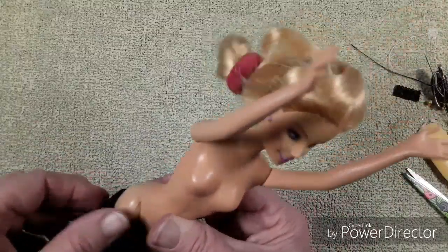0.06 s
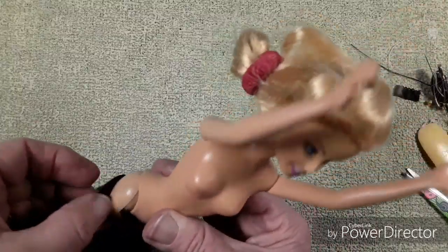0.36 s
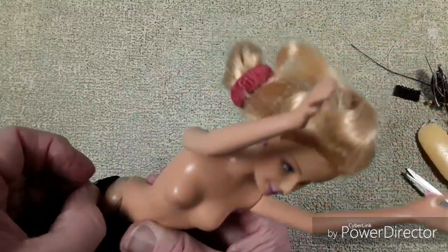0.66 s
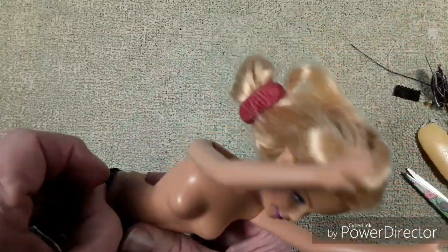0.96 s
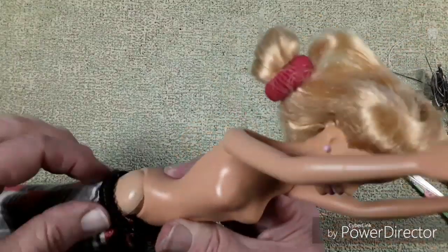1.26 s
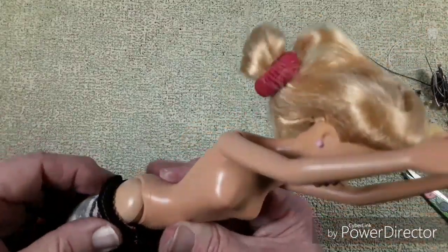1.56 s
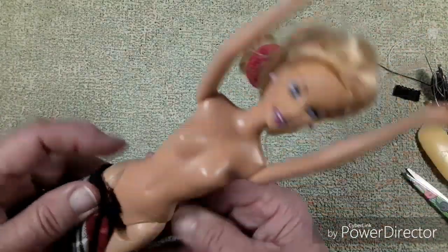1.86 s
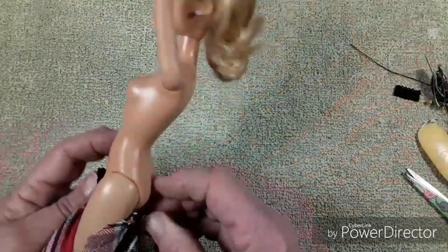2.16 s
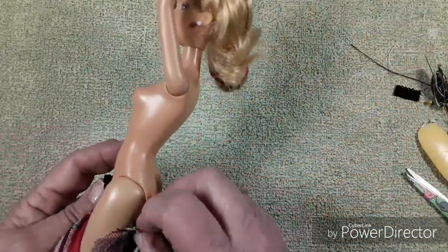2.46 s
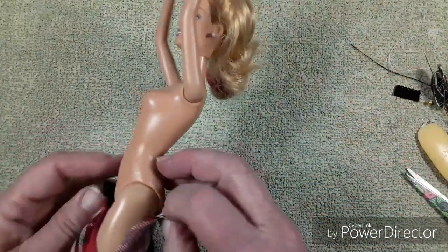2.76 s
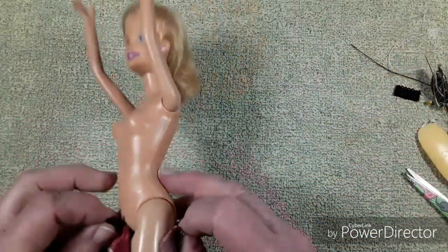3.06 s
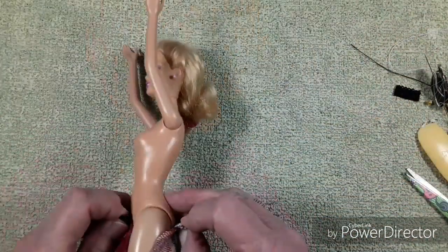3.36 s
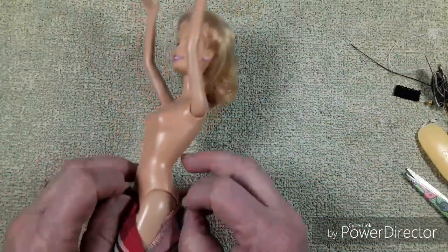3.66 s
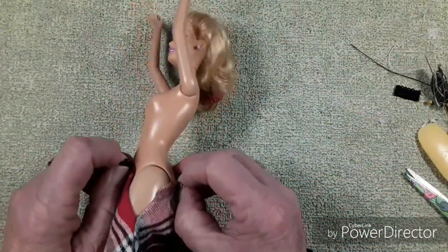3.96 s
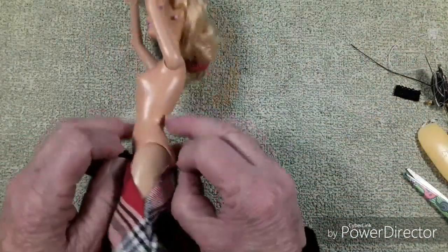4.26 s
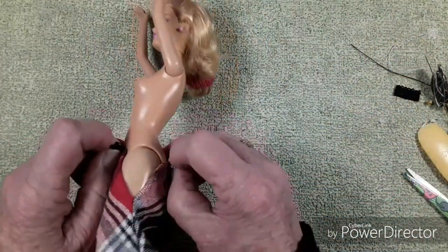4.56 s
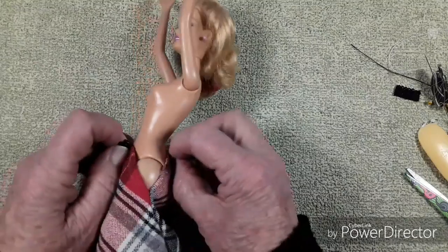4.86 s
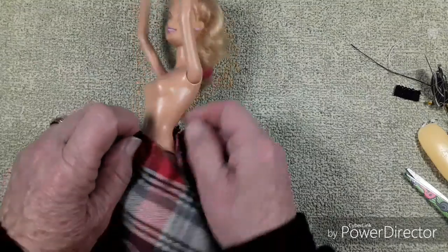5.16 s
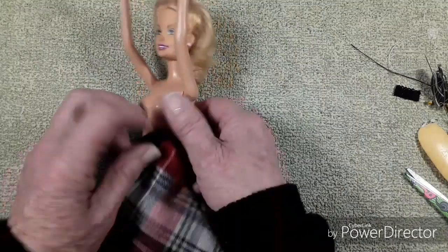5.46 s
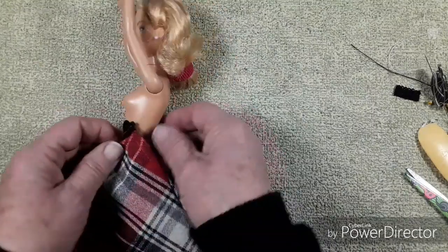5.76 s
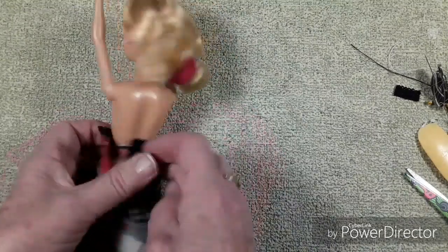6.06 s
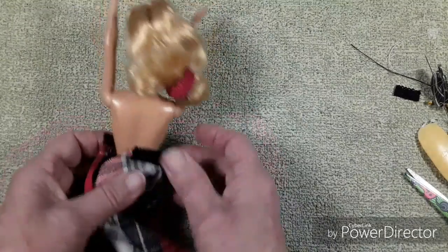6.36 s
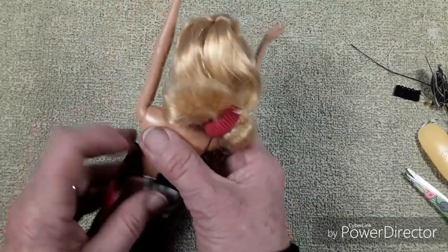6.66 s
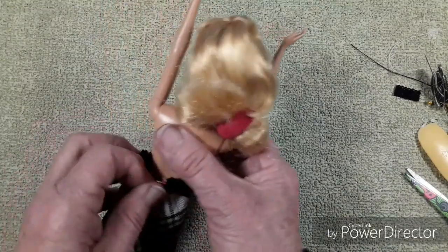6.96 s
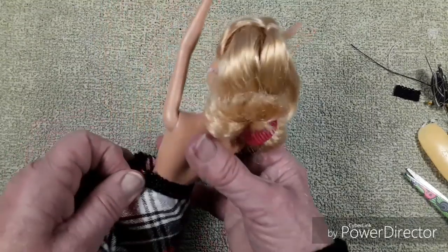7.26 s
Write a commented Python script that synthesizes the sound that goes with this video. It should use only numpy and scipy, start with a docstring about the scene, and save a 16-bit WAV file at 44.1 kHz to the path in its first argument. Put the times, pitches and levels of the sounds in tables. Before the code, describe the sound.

Hands work a fabric skirt up a plastic doll: soft rustles, little joint clicks and a tiny hook ticking and scraping in a quiet room.

```python
"""Cloth rustles faintly over a low hum as hands pull a skirt up a plastic doll, above a covered table.
Friction makes the weave hiss and catch, the waistband judders by stick-slip, and the doll's joints click.
The skirt's small metal hook ticks and scrapes, ringing in its modes, while the handling shakes the table.
The room is quiet; a small close microphone with a sharp treble resonance gives everything a thin sizzle."""
import sys
import numpy as np
from scipy import signal
from scipy.fft import rfft, irfft, next_fast_len
from scipy.io import wavfile

SR = 44100
rng = np.random.default_rng(int(sys.argv[2]) if len(sys.argv) > 2 else 0)


def unload_audio(sound):
    """Save the sound as a 16-bit wav file, at the path given as the first command line argument."""
    columns = np.transpose(np.atleast_2d(sound))
    # keep every value between -1 and 1, then stretch to whole-number steps
    steps = np.round(np.clip(columns, -1, 1) * 32767)
    wavfile.write(sys.argv[1], SR, steps.astype(np.int16))


N = 327133
TIME = np.arange(N) / SR
CLICK_DELAY_S = 0.00047   # the doll's clicks and the hook's ticks sound this long after their listed times


def from_db(db):
    """Amplitude ratio of a level in decibels."""
    return 10 ** (np.asarray(db) / 20)


def unit_rms(x):
    """Normalisation to unit mean power."""
    return x / np.sqrt(np.mean(x ** 2) + 1e-20)


def envelope(rows):
    """Amplitude envelope, interpolated in decibels between (time, level) points."""
    times, db = np.transpose(rows)
    return from_db(np.interp(TIME, times, db))


def coloured(x, spectrum):
    """Spectral shaping to unit rms, falling 12 dB per octave below the first point."""
    size = next_fast_len(N)
    hz, db = np.transpose(spectrum)
    log_f = np.log(np.arange(size // 2 + 1) * SR / size + 1e-9)
    gain = from_db(np.interp(log_f, np.log(hz), db))
    gain *= np.minimum(np.exp(log_f) / hz[0], 1) ** 2
    return unit_rms(irfft(rfft(x, size) * gain, size)[:N])


def drift(per_s):
    """Random modulation of unit rms, linear between Gaussian values."""
    knots = rng.standard_normal(N // 20)
    return unit_rms(np.interp(TIME * per_s, np.arange(len(knots)), knots))


def swell(offset_s, length_s):
    """Gaussian envelope of a stroke about its middle."""
    return np.exp(-2 * (2 * offset_s / length_s) ** 2)


def swells(rows):
    """Superposition of stroke envelopes."""
    out = np.zeros(N)
    for middle, length, db in rows:
        near = slice(*np.searchsorted(TIME, [middle - 2 * length, middle + 2 * length]))
        out[near] += from_db(db) * swell(TIME[near] - middle, length)
    return out


def strokes(rows, spectrum, ripple_db, threads_per_s):
    """Friction noise, amplitude-modulated as each stroke crosses the threads."""
    friction = rng.standard_normal(N) * from_db(ripple_db * drift(threads_per_s))
    return swells(rows) * coloured(friction, spectrum)


def impulses(times, sizes):
    """Brief forces idealised as an impulse train."""
    out = np.zeros(N)
    samples = np.round(np.asarray(times) * SR).astype(int)
    np.add.at(out, np.clip(samples, 0, N - 1), sizes)
    return out


def ring(force, modes):
    """Modal superposition: each impulse excites one damped sinusoid per mode."""
    out = np.zeros(N)
    for k, (hz, db, t60) in enumerate(modes):
        radius = np.exp(-np.log(1000) / (t60 * SR))
        angle = 2 * np.pi * hz / SR
        poles = [1, -2 * radius * np.cos(angle), radius ** 2]
        out += (-1) ** k * from_db(db) * signal.lfilter([0, np.sin(angle)], poles, force + 1e-18)
    return out


def chatter(times, db, share, settle_s):
    """Contact bounce: random after-touches follow each impact and decay exponentially."""
    age = TIME[:SR // 20]
    touches = rng.standard_normal((len(times), len(age))) * np.exp(-age / settle_s)
    touches *= share / np.linalg.norm(touches, axis=1, keepdims=True)
    touches[:, 0] = 1   # the impact itself
    return impulses(times[:, None] + age, from_db(db)[:, None] * touches)


def slip_train(middle, length, per_s, uneven, db):
    """Stick-slip friction: nearly periodic impulses that swell and fade."""
    lateness, scatter_db = rng.standard_normal((2, 801))
    count = len(lateness)
    offset = (np.arange(count) - count // 2 + uneven * lateness) / per_s
    sizes = swell(offset, length) * from_db(db + uneven * scatter_db)
    return impulses(middle + offset, sizes * rng.choice([-1, 1], count))


def small_radiator(x, edge_hz=2360, order=2):
    """Radiation efficiency: a source much smaller than the wavelength loses its lows."""
    return signal.sosfilt(signal.butter(order, edge_hz, "high", fs=SR, output="sos"), x + 1e-18)


# noise floor: (frequency [Hz], relative spectral level [dB])
BACKGROUND_SPECTRUM = [(30, -5), (70, -8), (160, -0.5), (300, -2.5), (600, -20), (1300, -23.5), (2300, -18),
                       (4000, -37.5), (6500, -45.5), (8500, -57.5), (12000, -27.5), (15500, -13.5)]
def background(level_db=-65.5):
    """Stationary noise: a low rumble with a faint hiss."""
    return from_db(level_db) * coloured(rng.standard_normal(N), BACKGROUND_SPECTRUM)


def room(x, level_db=-10.5, t60_s=0.16, first_echo_s=0.0031):
    """Diffuse reverberation: dense reflections decay exponentially in a small furnished room."""
    age = TIME[:SR // 2]
    decay = np.exp(-np.log(1000) * age / t60_s) * (age > first_echo_s)
    tail = rng.standard_normal(len(age)) * decay
    return from_db(level_db) * signal.oaconvolve(x, tail / np.linalg.norm(tail))[:N]


# shaking, stronger once the doll stands and the hands lean on the table: (time [s], level [dB])
LEANING = [(0.0, -67), (.27, -76.5), (.48, -64), (1.0, -68), (1.7, -65.5), (3.03, -69), (3.15, -59),
           (7.42, -57)]
# shoves that rock the table: (centre time [s], duration [s], level [dB])
SHOVES = [(3.45, 0.099, -61), (3.63, 0.11, -56), (3.87, 0.3, -53.5), (4.26, 0.19, -56.5), (5.25, 0.31, -59),
          (5.72, .18, -54), (5.94, 0.21, -56), (6.28, 0.3, -49), (6.6, 0.21, -47.5), (6.74, 0.12, -48.5),
          (7.35, 0.24, -52.5)]
def table_shake(mode_hz=39.5, wander_hz=2.2, unsteady_db=2.8):
    """Forced vibration: the hands keep the table moving unsteadily in its lowest mode."""
    phase = 2 * np.pi * np.cumsum(mode_hz + wander_hz * drift(16)) / SR
    vibration = unit_rms(np.sin(phase) * from_db(unsteady_db * drift(15)))
    return (envelope(LEANING) + swells(SHOVES)) * vibration


# hand and doll meet the table: (time [s], force level [dB])
BUMPS = [(0.074, -65), (1.505, -68), (1.53, -74), (3.241, -62), (3.266, -61), (3.29, -66), (5.412, -50.5),
         (5.422, -41.5), (6.019, -59), (6.531, -64)]
# table resonances: (frequency [Hz], gain [dB], T60 [s])
TABLE_MODES = [(109.6, -7, 0.15), (156, -5, 0.23), (258.4, 1.5, 0.3), (335, -6, 0.17), (416, -5, 0.1),
               (663, -7.5, 0.052), (1057, -9.5, 0.011)]
def table_bumps(soft_hz=1500):
    """Compliant impact: a soft contact low-passes the force that excites the table's modes."""
    times, db = np.transpose(BUMPS)
    softness = signal.butter(1, soft_hz, fs=SR, output="sos")
    force = signal.sosfilt(softness, impulses(times, from_db(db)) + 1e-18)
    return ring(force, TABLE_MODES)


# how hard the fingers work: (time [s], relative level [dB])
EFFORT = [(0.0, -66), (3.18, -64), (3.39, -55), (4.21, -63.5), (4.55, -56), (4.85, -61.5), (5.64, -56),
          (6.8, -59), (7.13, -63.5), (7.42, -64.5)]
# fingers on the doll: (frequency [Hz], relative spectral level [dB])
RUBBING_SPECTRUM = [(50, -2.5), (85, 1.5), (132, -1), (158, 8.5), (185, -6), (218, 1), (310, -6.5),
                    (450, -12), (700, -15), (1200, -21), (3200, -39)]
def finger_rubbing(gain_db=-2.5, uneven_db=1.98):
    """Sliding friction: dull noise whose amplitude follows the effort of the fingers."""
    effort = envelope(EFFORT) * from_db(gain_db + uneven_db * drift(17))
    return effort * coloured(rng.standard_normal(N), RUBBING_SPECTRUM)


# shifts of grip: (centre time [s], duration [s], level [dB])
REGRIPS = [(1.54, 0.054, -62), (3.28, 0.22, -54), (6.02, 0.062, -64.5), (6.57, 0.21, -55.5)]
# dull scuff: (frequency [Hz], relative spectral level [dB])
SCUFF_SPECTRUM = [(100, -19), (155, 7), (185, 0.5), (220, 9.5), (310, 4), (400, -16), (700, -24),
                  (1500, -32), (3000, -45)]
def grip_scuffs():
    """Transient friction: each shift of grip gives a burst of low noise."""
    return strokes(REGRIPS, SCUFF_SPECTRUM, ripple_db=2.5, threads_per_s=56)


# quick finger strokes: (centre time [s], duration [s], level [dB])
BRUSHES = [(1.52, 0.5, -71), (1.722, 0.031, -61), (1.752, 0.055, -57), (1.872, 0.043, -54.5),
           (1.925, 0.04, -62), (6.32, 0.09, -74)]
# fingers on the weave: (frequency [Hz], relative spectral level [dB])
BRUSH_SPECTRUM = [(500, -39), (2500, -24), (4500, -11), (6500, -13.5), (8500, -7.5), (11000, -2),
                  (15500, 3)]
def finger_brushes():
    """Roughness noise: fingers cross the threads quickly and make a bright hiss."""
    return strokes(BRUSHES, BRUSH_SPECTRUM, ripple_db=1.5, threads_per_s=1000)


# pulls of the skirt: (centre time [s], duration [s], level [dB])
SLIDES = [(0.28, 0.05, -73), (0.945, 0.09, -67.5), (1.03, 0.1, -77), (1.215, 0.086, -71.5),
          (1.275, 0.05, -77), (2.07, 0.26, -71), (2.24, 0.31, -69.5)]
# cloth on plastic: (frequency [Hz], relative spectral level [dB])
SLIDE_SPECTRUM = [(600, 12.5), (1500, 0.5), (1950, 10.5), (2270, 16), (2750, 3.5), (3600, -1), (4200, -0.5),
                  (4650, 7), (5100, -4.5), (5600, -1.5), (7000, -4), (10000, -4.5), (15000, -6)]
def skirt_slides():
    """Resonant colouring: the hollow hips shape the friction noise of the sliding skirt."""
    return strokes(SLIDES, SLIDE_SPECTRUM, ripple_db=2.5, threads_per_s=300)


# taut threads zip over plastic: (centre time [s], duration [s], level [dB])
WHISTLES = [(2.813, 0.026, -69), (2.945, 0.085, -79.5), (3.1, 0.093, -83.5), (3.88, 0.094, -72),
            (3.976, 0.014, -70.5), (4.183, 0.016, -78), (4.22, 0.02, -83), (5.045, 0.038, -80.5),
            (5.078, 0.054, -76), (5.575, 0.036, -82.5), (5.735, 0.015, -96), (5.94, 0.031, -84),
            (6.28, 0.033, -82.5), (6.635, 0.049, -79.5)]
def thread_whistles(pitch_hz=8470, wander_hz=206, jitter_hz=418, flutter_db=2.5):
    """Friction-induced oscillation: a thin, unsteady tone flutters as threads grip and let go."""
    hz = pitch_hz + wander_hz * drift(45) + jitter_hz * drift(1600)
    tone = np.sin(2 * np.pi * np.cumsum(hz) / SR)
    return swells(WHISTLES) * unit_rms(tone * from_db(flutter_db * drift(170)))


# one squeak of cloth on plastic: (time [s], frequency [Hz], half duration [s], level [dB])
SQUEAK = (3.6176, 8450, .0007, -40.5)
def cloth_squeak(fall_hz_per_s=300000):
    """Rapid stick-slip: the slips fuse into a very short falling chirp."""
    middle, hz, half_length, db = SQUEAK
    offset = TIME - middle
    phase = 2 * np.pi * (hz - .5 * fall_hz_per_s * offset) * offset
    return from_db(db) * np.exp(-(offset / half_length) ** 2) * np.sin(phase)


# the skirt never lies quite still in the fingers: (time [s], relative level [dB])
CREEP = [(0.0, -72), (1.12, -75), (1.45, -70), (1.82, -75), (2.09, -64), (2.55, -75), (3.26, -67),
         (4.15, -68), (4.42, -61), (4.66, -69), (4.9, -66), (5.0, -71), (5.29, -65), (5.66, -70),
         (6.62, -68), (6.84, -81), (7.08, -81), (7.42, -71)]
# tugs at the waistband: (centre time [s], duration [s], relative level [dB])
TUGS = [(0.275, 0.061, -67.5), (0.94, 0.05, -65), (1.21, 0.086, -61), (1.28, 0.04, -66), (1.45, 0.041, -69),
        (1.59, 0.075, -65), (2.14, 0.28, -98), (2.925, 0.093, -60), (3.345, 0.13, -54),
        (3.56, 0.031, -53.5), (3.885, 0.19, -58.5), (3.976, 0.013, -59), (4.63, 0.039, -57),
        (5.395, 0.056, -57), (6.31, 0.14, -65), (6.745, 0.13, -57.5), (7.18, 0.12, -66.5),
        (7.38, 0.16, -66)]
# rustling weave: (frequency [Hz], relative spectral level [dB])
CLOTH_SPECTRUM = [(400, -1.5), (900, 7), (1500, -36.5), (2300, 3.5), (3200, 3), (4700, 0.5), (6500, -4),
                  (8500, 3), (11000, 5.5), (15500, -2)]
def cloth_rustle(gain_db=-15, creep_db=0.5, fidget_db=2.6, clump_db=3.0, catches_per_s=500):
    """Shot noise: threads catch and let go over the hiss of sliding weave, swelling in clumps."""
    speed = envelope(CREEP) * from_db(creep_db - fidget_db * drift(17)) + swells(TUGS)
    caught = rng.random(N) < catches_per_s / SR
    catch_db = 2.0 * np.minimum(rng.exponential(1, N), 4)
    catches = unit_rms(caught * from_db(catch_db) * rng.choice([-1, 1], N))
    hiss = 0.81 * rng.standard_normal(N)
    return from_db(gain_db + clump_db * drift(60)) * speed * coloured(catches + hiss, CLOTH_SPECTRUM)


# the tight waistband judders over the hips:
# (centre time [s], duration [s], slip rate [1/s], unevenness [0-1], level [dB], ring coupling [dB])
CREAKS = [(2.436, 0.03, 255, 0.03, -34.5, -19.5), (2.674, .018, 400, 0.15, -52.5, -17.5),
          (2.797, .022, 700, 0.38, -56, -13), (2.813, 0.014, 420, .25, -41, -20.5),
          (2.949, 0.018, 290, 0.1, -45.5, -17)]
# plastic and hook under the waistband: (frequency [Hz], gain [dB], T60 [s])
CREAK_MODES = [(1560, -1.5, 0.0067), (2600, -1.5, 0.0099), (3590, 3.5, 0.013), (4600, -14, 0.0099),
               (6250, -8, 0.015), (6970, -8, 0.0054)]
def waistband_creaks():
    """Relaxation oscillation: each slip of the waistband snaps and rings what lies under it."""
    slips, on_plastic = np.zeros((2, N))
    for middle, length, per_s, uneven, db, ring_db in CREAKS:
        train = slip_train(middle, length, per_s, uneven, db)
        slips += train
        on_plastic += train * from_db(ring_db)
    return small_radiator(slips) + ring(on_plastic, CREAK_MODES)


# one pop of the hip joint: (time [s], snap level [dB], leg level [dB])
HIP_POP = (1.2448, -32, -52)
# hollow leg: (frequency [Hz], gain [dB], T60 [s])
LEG_MODES = [(1006, 0, 0.0055), (2130, 9, 0.0048), (2840, 9, 0.0033), (4120, 1.5, 0.0067),
             (5700, 2, 0.0049), (6300, -12, .004)]
def hip_pop():
    """Impulsive release: the joint lets go with a snap that rings the hollow leg."""
    times, snap_db, leg_db = np.transpose([HIP_POP])
    snap = small_radiator(chatter(times, snap_db, share=0.9, settle_s=0.0014))
    leg = ring(chatter(times, leg_db, share=1.0, settle_s=0.0011), LEG_MODES)
    return snap + leg


# joints and limbs click, and the fastening knocks on the doll:
# (time [s], snap level [dB], shell level [dB], relative torso level [dB])
DOLL_CLICKS = [(1.8894, -44, -70, -58), (2.217, -72, -62, -60), (2.734, -51.5, -72, -78),
               (3.273, -36, -56, -62), (3.327, -36, -40, -53), (3.333, -42, -53, -49),
               (3.441, -50, -63, -71), (3.4824, -63, -56, -70), (3.8263, -40, -52, -48.5),
               (3.8352, -45, -59, -50.5), (3.8456, -46, -57, -51), (4.104, -53.5, -58, -62),
               (4.4349, -39, -48, -50), (4.4499, -46, -39.5, -59), (4.589, -62, -53.5, -66),
               (4.849, -77, -60, -61), (5.409, -52, -51, -46), (5.423, -66, -56, -48),
               (5.745, -55, -51, -60), (6.7696, -45.5, -34.5, -53), (6.8218, -80, -42.5, -48.5)]
# hollow shell and torso: (frequency [Hz], gain [dB], T60 [s])
SHELL_MODES = [(1570, 1, 0.0044), (2130, 10, 0.0032), (2366, 2.5, 0.0073), (2800, -18, 0.0054),
               (4540, -17, 0.00061), (5040, -22, 0.01), (6690, -17.5, 0.008)]
TORSO_MODES = [(497, 2, 0.012), (746, 2.5, 0.0086), (1030, 1, 0.012), (1290, -5.5, 0.012)]
def doll_clicks(knock_db=-2):
    """Impact excitation: each contact gives a dry snap, rings the shell and knocks the torso."""
    times, snap_db, shell_db, torso_db = np.transpose(DOLL_CLICKS)
    times = times + CLICK_DELAY_S
    snap = small_radiator(chatter(times, snap_db, share=1.82, settle_s=0.0017))
    shell = ring(chatter(times, shell_db, share=0.76, settle_s=0.0023), SHELL_MODES)
    knock = ring(chatter(times, torso_db, share=0.57, settle_s=0.0028), TORSO_MODES)
    return snap + shell + from_db(knock_db) * knock


# the hook strikes its eye: (time [s], snap level [dB], ring level [dB])
HOOK_TICKS = [(3.7977, -34, -49), (3.8269, -25.5, -42.5), (3.8447, -33, -45.5), (3.972, -50, -76),
              (4.178, -58, -79), (4.2548, -39.5, -46.5), (4.3459, -26.5, -39.5), (4.3822, -32, -45),
              (4.4349, -15.5, -28), (4.4755, -9.5, -22), (5.1876, -44, -58), (5.2497, -37.5, -56),
              (5.452, -50, -55.5), (5.891, -57, -59)]
# metal hook: (frequency [Hz], gain [dB], T60 [s])
HOOK_MODES = [(3340, -8, 0.0067), (3525, 1.5, 0.015), (3690, -4, 0.011), (4650, -17, 0.007),
              (5380, -7.5, 0.005), (6360, -11, 0.006), (6850, -15.5, .005), (8000, -17, .005)]
def hook_ticks(grip_detune=0.008, uneven_db=2.5):
    """Free vibration after a thin snap: each new grip shifts the pitch and strength of the modes."""
    times, snap_db, ring_db = np.transpose(HOOK_TICKS)
    times = times + CLICK_DELAY_S
    contacts = chatter(times, snap_db, share=1.0, settle_s=0.0017)
    out = small_radiator(contacts, edge_hz=3300, order=4)
    age = TIME[:SR // 20]
    hz, mode_db, t60 = np.transpose(HOOK_MODES)[:, :, None]
    signs = (-1) ** np.arange(len(HOOK_MODES))[:, None]
    for time, db in zip(times, ring_db):
        shift, strength = rng.standard_normal((2, len(HOOK_MODES), 1))
        decays = from_db(db + mode_db + uneven_db * strength) * np.exp(-np.log(1000) * age / t60)
        tones = np.sin(2 * np.pi * hz * (1 + grip_detune * shift) * age)
        start = round(time * SR)
        out[start:start + len(age)] += np.sum(signs * decays * tones, axis=0)
    return small_radiator(out, edge_hz=1700)


# the hook scrapes on cloth and plastic: (centre time [s], duration [s], level [dB], hook coupling [dB])
HOOK_DRAGS = [(3.619, 0.0049, -45, -9), (3.8495, 0.0086, -36, -21), (4.278, 0.043, -59.5, -8),
              (4.302, 0.02, -52, -11), (4.392, 0.043, -36, -12.5), (4.4328, 0.0057, -25.5, -14),
              (4.4403, 0.0058, -33.5, -18), (5.307, 0.3, -60.5, -22), (5.401, 0.086, -51, -19.5),
              (6.039, 0.04, -61.5, -8)]
def hook_drags(pressed_t60_share=0.82, shell_db=-26, torso_db=-29):
    """Stick-slip excitation: fast, uneven slips ring the doll and the hook, damped by being pressed."""
    slips, on_hook = np.zeros((2, N))
    for middle, length, db, hook_db in HOOK_DRAGS:
        train = slip_train(middle, length, per_s=2000, uneven=0.53, db=db)
        slips += train
        on_hook += train * from_db(hook_db)
    pressed_modes = [(hz, db, t60 * pressed_t60_share) for hz, db, t60 in HOOK_MODES]
    shell = from_db(shell_db) * ring(slips, SHELL_MODES)
    torso = from_db(torso_db) * ring(slips, TORSO_MODES)
    return small_radiator(slips) + ring(on_hook, pressed_modes) + shell + torso


def scene():
    """Linear superposition of the bright sounds, their reflections, dull handling and the noise floor."""
    stroking = finger_brushes() + skirt_slides()
    scuffs = grip_scuffs()
    contacts = doll_clicks() + hook_ticks() + hip_pop() + hook_drags() + waistband_creaks()
    bright = stroking + contacts + cloth_squeak() + thread_whistles() + cloth_rustle()
    ambience = background() + room(bright)
    handling = scuffs + finger_rubbing() + table_shake() + table_bumps()
    return (bright + ambience + handling)[None]


def record(dry, port_hz=8457, port_width_hz=750, lift_db=5.5, lift_width_hz=910):
    """Cavity resonance: air in the microphone's port peaks in the treble; above it the response falls."""
    radius = np.exp(-np.pi * port_width_hz / SR)
    port = np.array([1, -2 * radius * np.cos(2 * np.pi * port_hz / SR), radius ** 2])
    heard = signal.lfilter([port.sum()], port, dry)
    peak_band = signal.lfilter(*signal.iirpeak(port_hz, port_hz / lift_width_hz, fs=SR), heard)
    heard = heard + (from_db(lift_db) - 1) * peak_band
    roll_off = signal.butter(2, 8450, fs=SR, output="sos")
    steep_cut = signal.ellip(10, .2, 70, 15800, fs=SR, output="sos")
    return signal.sosfilt(steep_cut, signal.sosfilt(roll_off, heard))


dry = scene()
out = record(dry)
unload_audio(out)
```